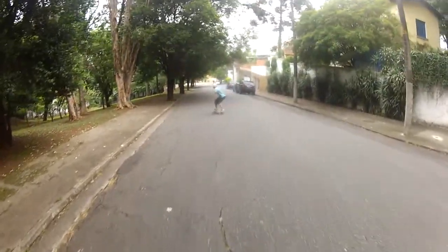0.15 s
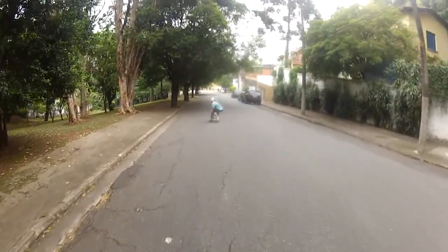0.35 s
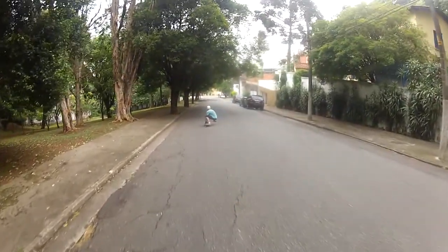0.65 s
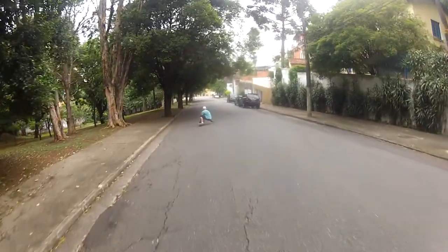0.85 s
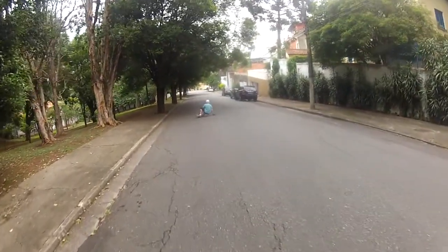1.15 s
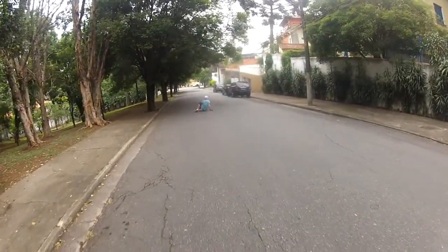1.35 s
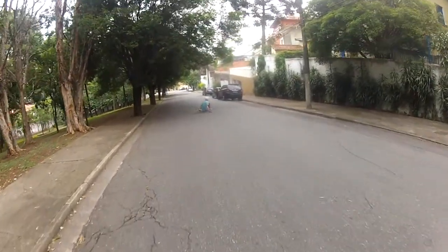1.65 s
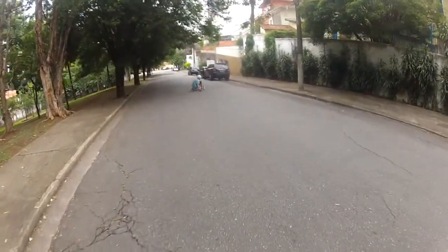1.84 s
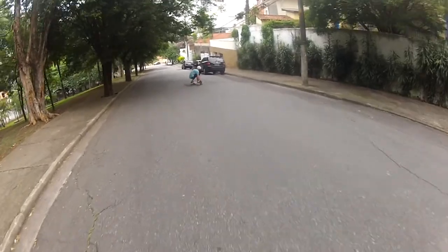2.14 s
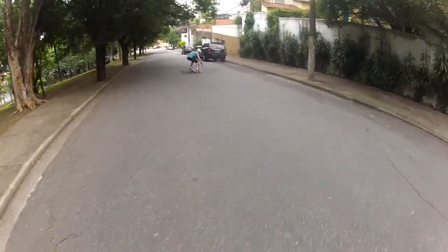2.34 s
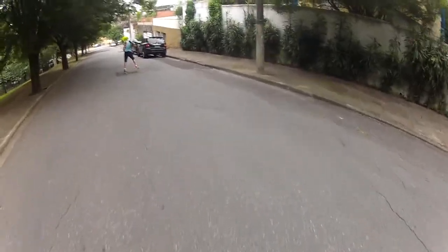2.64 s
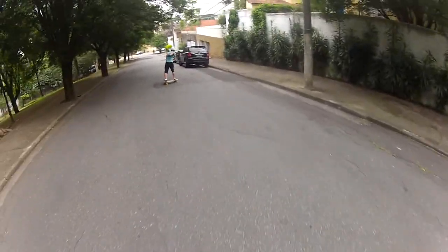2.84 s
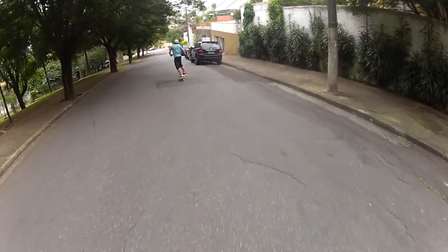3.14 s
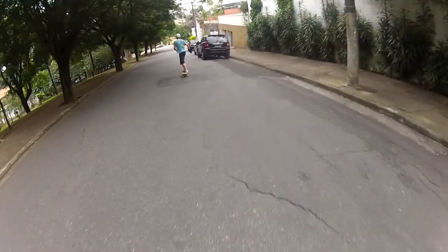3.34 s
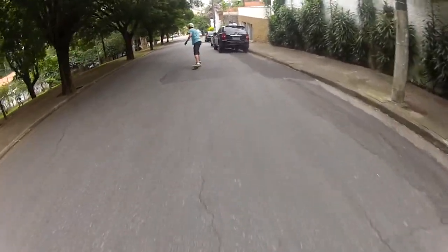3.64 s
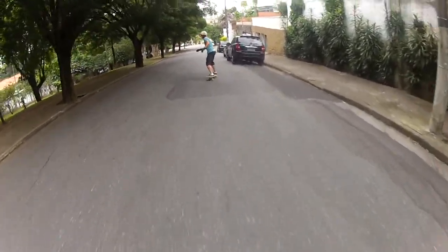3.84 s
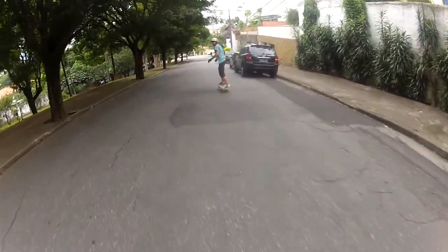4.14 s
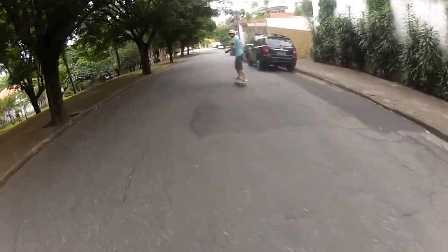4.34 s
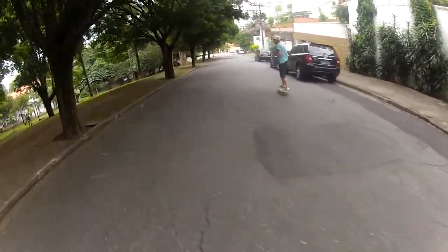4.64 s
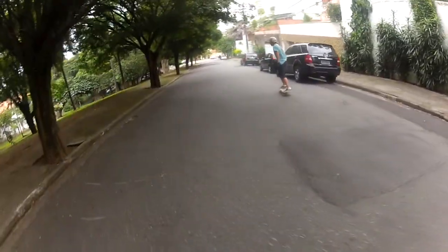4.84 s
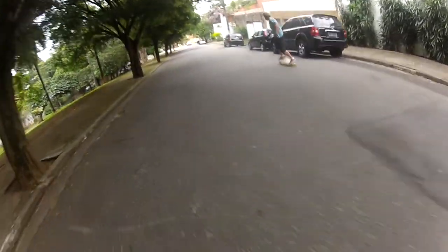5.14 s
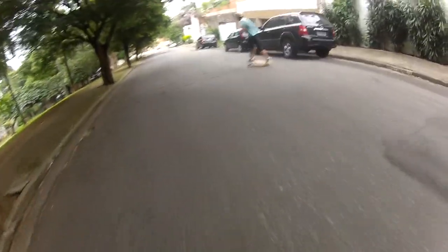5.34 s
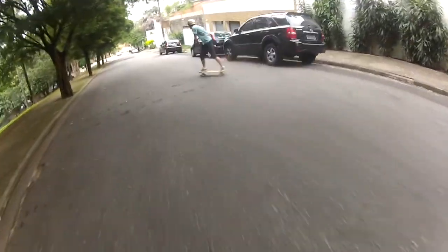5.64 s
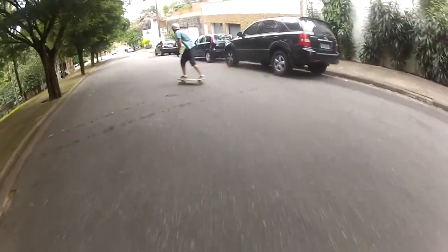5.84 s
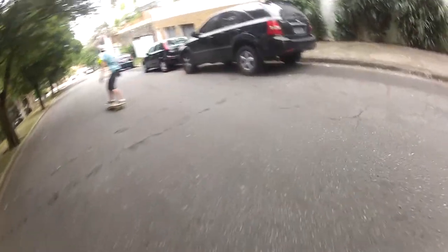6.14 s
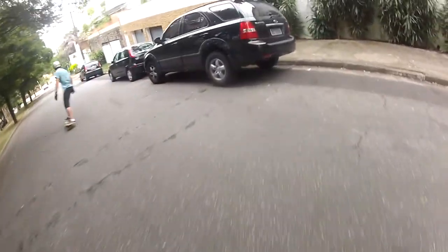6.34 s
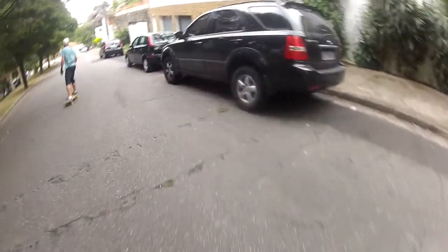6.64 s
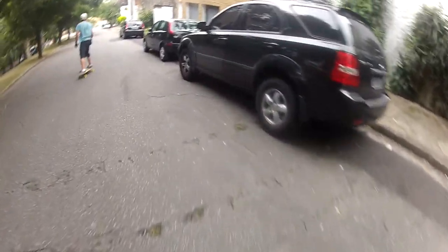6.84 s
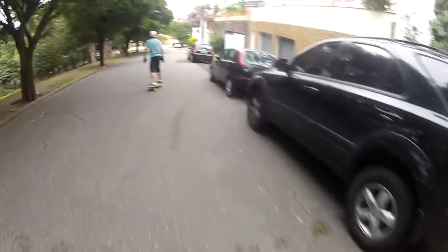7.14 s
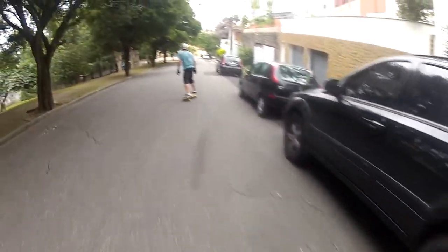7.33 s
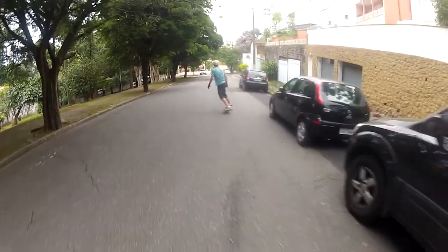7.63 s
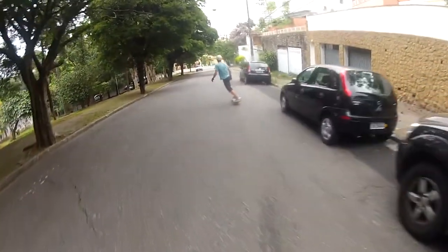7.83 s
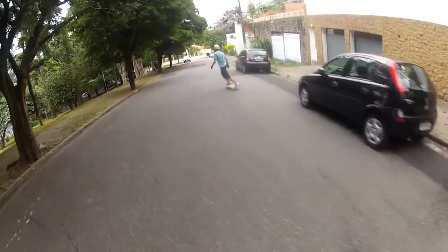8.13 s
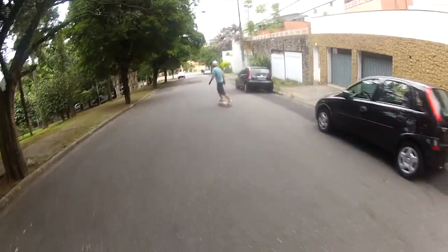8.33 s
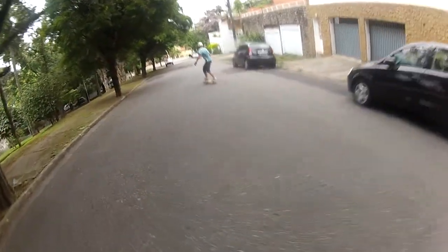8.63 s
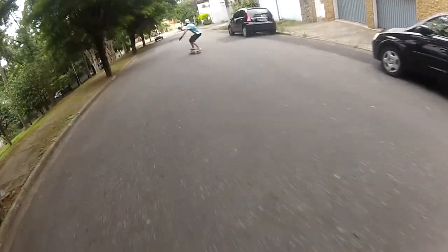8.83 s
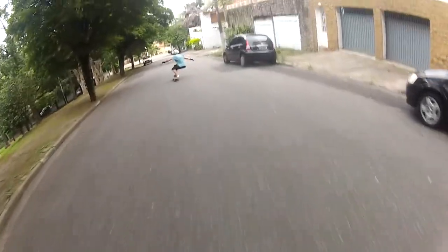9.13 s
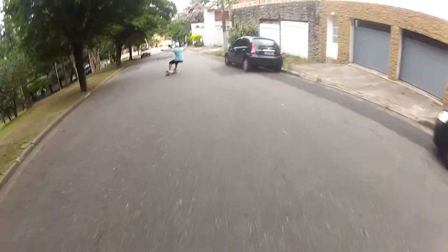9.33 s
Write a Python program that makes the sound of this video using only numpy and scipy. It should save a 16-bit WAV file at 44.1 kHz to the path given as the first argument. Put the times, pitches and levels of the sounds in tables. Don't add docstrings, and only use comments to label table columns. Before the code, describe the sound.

Low muffled rolling of a skateboard on a coarse street, broken by sharp wheel knocks, gritty ticks, wind thumps and faint bird chirps.

```python
import sys
import numpy as np
from scipy import signal
from scipy.fft import rfft, irfft, next_fast_len
from scipy.io import wavfile
from scipy.ndimage import uniform_filter1d, map_coordinates

SR = 44100
rng = np.random.default_rng(int(sys.argv[2]) if len(sys.argv) > 2 else 0)


def voltage_ratio(decibels):
    exponent = np.asarray(decibels, float) / 20
    return 10 ** exponent


def master_out(mix):
    frames = np.transpose(np.atleast_2d(mix))
    ceiling = np.clip(frames, -1, 1)
    pcm = np.round(ceiling * 32767).astype(np.int16)
    wavfile.write(sys.argv[1], SR, pcm)


N = 418068

# t/s, f/Hz, level/dB
WHISTLES = [
    [(0, 3670, -51), (.03, 3650, -60), (.05, 3620, -53), (.075, 3650, -61), (.205, 3680, -64)],
    [(.12, 3550, -58), (.2, 3250, -62)],
    [(7.87, 3700, -64), (7.9, 4060, -54), (7.95, 4270, -63), (8.005, 4200, -50), (8.035, 3800, -61)],
]
# t/s at the top, top f/Hz, fall/ms, level/dB
CHIRPS = [(6.975, 5050, 8, -60), (7.035, 5800, 11, -56), (7.118, 5400, 8, -57), (7.158, 5600, 8, -64),
          (7.208, 5700, 8, -66), (7.255, 5500, 44, -52.5), (7.355, 5600, 16, -53), (7.478, 5400, 16, -62),
          (7.575, 5930, 8, -55), (7.707, 5200, 32, -53), (7.825, 5500, 8, -63)]
BIRD_DB, FAINT_DB = 5.5, -5
RISE_MS, RISE_HZ, FALL_HZ, FALL_HZ_PER_MS = 10.3, 710, 500, 12

# t/s, level/dB
AIR_SPEED = [(0, -32.5), (1.25, -35), (1.65, -28.5), (2.3, -31.5), (2.85, -27.5), (3.2, -29), (4.3, -26.5),
             (4.5, -28.5), (4.68, -22.5), (5.1, -25.5), (5.35, -27.5), (5.7, -28.5), (5.9, -32.5),
             (6.5, -28.5), (7.2, -30.5), (8, -27), (8.5, -25.5), (9.48, -29.5)]
# f/Hz, level/dB
BUFFET = [(18, -28), (30, -11), (55, -4.5), (100, -2.5), (150, -5), (250, -42)]

# level/dB, attack/ms, hold/ms, t60/ms
SCRAPE = (-47.5, 5, 30, 450)
SCRAPE_S = 2.792
# f/Hz, width/Hz, level/dB
SCRAPED = [(2900, 800, 1), (4070, 500, -0.5), (5000, 1200, -13)]
# t/s, peak level/dB, start f/Hz, end f/Hz, length/ms
PEBBLE = (2.3798, -4, 760, 2900, 5.5)
# t/s, peak level/dB, f/Hz
TICKS = [(0.506, -36, 2780), (2.0178, -29, 2500), (2.818, -29.5, 2700), (4.3258, -34, 2600),
         (4.3412, -22.5, 2660), (4.439, -27, 2570), (5.3476, -28, 2320), (5.646, -25, 2620),
         (5.7456, -26.5, 2320), (6.3335, -35, 2760), (6.347, -36, 3160), (6.7127, -37, 2900),
         (6.783, -33.5, 2870), (7.47, -32, 2700), (7.635, -32, 1810), (7.646, -30, 1550),
         (7.871, -32, 2760), (9.2848, -25.5, 2280)]
TICK_T60_MS, TICK_CRACK_DB = 19, -2.5
# t/s, peak level/dB, f/Hz
CHIPS = [(0.4978, -34, 4510), (2.3734, -42, 4100), (2.379, -21.5, 4220), (2.7965, -25.5, 3200),
         (4.3425, -23.5, 4200), (4.4384, -43, 3800), (5.641, -25, 4330), (6.1115, -34, 4270),
         (8.1509, -46, 4800), (8.3814, -43, 4440), (8.662, -34, 4200), (9.2843, -26, 4300)]
CHIP_T60_MS, CHIP_CRACK_DB = 13, -8

# t/s, peak level/dB, f/Hz
CRACKS = [(0.548, -17, 435), (0.946, -10, 525), (1.21, -11.5, 430), (2.002, -9, 557), (3.353, -8, 520),
          (3.647, -8.5, 530), (3.773, -10, 530), (3.881, -4, 420), (4.359, -1.5, 355), (4.441, -5.5, 578),
          (4.531, -3, 338), (4.611, -18, 438), (4.978, -5, 430), (5.102, 0, 424), (5.327, -3, 562),
          (5.61, -9, 458), (5.747, 3, 523), (5.831, -8, 635), (5.897, -2, 530), (5.962, -8, 643),
          (6.016, -5.5, 693), (6.164, -4, 547), (7.122, -13, 467), (7.202, -20, 534), (7.409, -13, 509),
          (7.497, -35, 517), (7.646, -1, 392), (7.771, -8, 573), (7.874, 5.5, 384), (9.293, -5, 500)]
KNOCK_T60_MS, DAMPS_MS_PER_DB = 27.4, 1.4
# t/s, peak level/dB, f/Hz, t60/ms
SLAM = [
    (5.7465, 3, 523, 16),
]

# t/s, load level/dB, side load level/dB when carving
RIDE = [(0, -26.5, -5.5), (.6, -27, -3.5), (.97, -21, -5.5), (1.5, -18.5, -11), (1.9, -21.5, -6),
        (2.3, -15, -6.5), (2.56, -24, -5), (3.45, -18, -5.5), (4.3, -15, -4.5), (4.67, -18, -1),
        (5.4, -17.5, -1.5), (6.17, -17, -1), (6.23, -22.5, -1.5), (6.48, -27.5, -1.5), (6.95, -19, -4),
        (7.85, -16.5, -5), (8.2, -25, -2.5), (9.48, -15.5, -2)]
# t/s, shake level/dB from coarse asphalt, level/dB of fine sand in the bearings
RATTLE = [(0, -55, -12), (.98, -48.5, -13), (1.22, -42, -9.5), (1.7, -44, -9.5), (2.3, -43.5, -18),
          (2.62, -54, -21), (3.5, -46, -9.5), (4.1, -45.5, -13), (4.55, -40, -15.5), (5.05, -37.5, -13),
          (5.55, -38.5, -13), (6.02, -32.5, -15.5), (6.19, -38, -11), (6.205, -45, -8), (6.5, -50, -11.5),
          (6.95, -40, -14), (8.3, -44.5, -13.5), (9.48, -36.5, -12)]
# t/s, half length/ms, lift of the wheels/dB, jolt of the metal/dB
PATCHES = [(.27, 60, 7.5, 6.5), (.46, 52, -2, -3), (2.03, 35, 4, 0), (2.2, 31, 2, 3.5),
           (2.3825, 2.3, -6, -2), (2.42, 40, -0.5, 2.5), (2.98, 59, -1.5, 2.5), (4.06, 44, -0.5, 4),
           (4.3, 140, 3.5, 7.5), (4.42, 18, -6, -3), (4.52, 7.7, -3, -2), (5.1, 80, 2, 2),
           (5.3, 25, 0, 3.5), (5.45, 54, 1, 3), (5.641, 27, 3.5, 2.5), (5.72, 25, 3, 4.5),
           (5.79, 34, -2.5, -1.5), (5.87, 48, 2.5, 1.5), (6.03, 52, 4, 1.5), (6.16, 34, 0, 2.5),
           (6.97, 44, 2, 0), (7.3, 230, -3, -4), (7.65, 13, 3.5, 7.5), (7.81, 50, 1.5, 2.5),
           (8.53, 35, 2, 2), (8.77, 120, 3, 0), (8.9, 61, -5, 1), (9.0, 12, 3.5, -1), (9.1, 104, -3, -5.5),
           (9.29, 12, 3, 3.5)]
PATCH_BENDS = 0.84
# f/Hz, width/Hz, level/dB
DECK = [(133, 61, -10), (196.3, 54, 0), (251.3, 65, -1), (316.7, 74, -4.5)]
DECK_DB, DECK_PER_LOAD, DECK_PER_WIND = -23.5, 0.45, 0.82
# f/Hz, width/Hz, level/dB
WHEELS = [(445.5, 50, 2), (335, 120, -6.5)]
# f/Hz, width/Hz, level/dB
CARVE = [(509.7, 101, -2), (631.5, 234, -5), (787, 147, -8.5)]
# f/Hz, width/Hz, level/dB
TRUCKS = [(900, 190, 4.5), (1540, 1100, 0), (2104, 950, 0.5), (2900, 570, 0)]
# f/Hz, width/Hz, level/dB
AXLE = [(2320, 450, -1), (2690, 290, -3.5)]
AXLE_DB, AXLE_PER_SHAKE = -14.5, 0.97
# f/Hz, width/Hz, level/dB
BEARINGS = [(3850, 490, -1), (4700, 1200, -6.5), (5500, 930, -9)]


def unit(x):
    return x / np.sqrt(np.mean(x ** 2) + 1e-20)


def curves(rows):
    s, *columns = np.transpose(rows)
    return [np.interp(np.arange(N) / SR, s, column) for column in columns]


def wobble(rate):
    knots = rng.standard_normal(int(N * rate / SR) + 4)
    return map_coordinates(knots, [np.arange(N) * rate / SR])


def filtered(x, response):
    m = next_fast_len(N + SR // 2)
    return irfft(rfft(x, m) * response(np.fft.rfftfreq(m, 1 / SR)), m)[:N]


def modes(table, cut_hz, order):
    wall = signal.butter(order, 2 * np.pi * cut_hz, analog=True)

    def response(f):
        ring = 0
        for k, (centre, width, db) in enumerate(table):
            damping = 1j * f * width
            ring = ring + (-1) ** k * voltage_ratio(db) * damping / (centre * centre - f * f + damping)
        return ring * signal.freqs(*wall, 2 * np.pi * f)[1]
    return response


def grit(rate, spread_db, smooth):
    met = rng.random(N) < rate / SR
    size = np.minimum(rng.exponential(size=N), 3)
    stones = unit(met * voltage_ratio(spread_db * size) * rng.uniform(-1.11, 1, N))
    return stones + smooth * rng.standard_normal(N)


def patchy(x, depth_db):
    z = signal.stft(x, nperseg=512)[2]
    field = uniform_filter1d(rng.standard_normal(z.shape), 7, 0)
    field = uniform_filter1d(field, 12, 1)
    return signal.istft(z * voltage_ratio(depth_db * unit(field)), nperseg=512)[1][:N]


def hiss():
    return voltage_ratio(-56.0) * unit(filtered(rng.standard_normal(N), modes([(2700, 2100, 0)], 3800, order=2)))


def chirps():
    notes = []
    for s, hz, fall_ms, db in CHIRPS:
        fall_s = fall_ms / 1000
        fall_hz = FALL_HZ + FALL_HZ_PER_MS * fall_ms
        notes.append([(s - RISE_MS / 1000, hz - RISE_HZ, db + FAINT_DB),
                      (s, hz, db),
                      (s + 0.7 * fall_s, hz - 0.7 * fall_hz, db + 1.0),
                      (s + fall_s, hz - fall_hz, db + FAINT_DB)])
    return notes


def birds():
    out, t = np.zeros(N), np.arange(N) / SR
    for note in WHISTLES + chirps():
        s, hz, db = np.transpose(note)
        edge = np.clip(np.minimum(t - s[0], s[-1] - t) / 0.0036, 0, 1)
        turns = np.cumsum(np.interp(t, s, hz)) / SR
        out += edge * voltage_ratio(np.interp(t, s, db) + BIRD_DB) * np.sin(2 * np.pi * turns)
    return out * voltage_ratio(2.2 * wobble(60))


def wind():
    hz, db = np.transpose(BUFFET)

    def spectrum(f):
        return voltage_ratio(np.interp(np.log(f + 1), np.log(hz), db, -120, -120))
    air = filtered(rng.standard_normal(N), spectrum)
    return voltage_ratio(curves(AIR_SPEED)[0]) * unit(air * voltage_ratio(1.04 * wobble(7.1)))


def scrape():
    db, attack_ms, hold_ms, t60_ms = SCRAPE
    ms = (np.arange(N) / SR - SCRAPE_S) * 1000
    shape = np.clip(ms / attack_ms, 0, 1) * voltage_ratio(-60 * np.maximum(ms - hold_ms, 0) / t60_ms)
    grains = grit(rate=1500, spread_db=4, smooth=0.8)
    return voltage_ratio(db) * shape * unit(filtered(grains, modes(SCRAPED, 6500, order=2)))


def pebble():
    s, db, start_hz, end_hz, length_ms = PEBBLE
    u = np.clip((np.arange(N) / SR - s) * 1000 / length_ms, 0, 1)
    turns = np.cumsum(start_hz + (end_hz - start_hz) * u ** 1.2) / SR
    turns -= turns[round(s * SR)]
    envelope = voltage_ratio(db - 19 * np.minimum(2.4 * u, 1)) * (u > 0) * (1 - u ** 6)
    return envelope * np.sin(2 * np.pi * turns)


def knocks(events, attack_ms, boost_db):
    out, ms = np.zeros(N + SR), np.arange(SR // 8) / SR * 1000
    for s, db, hz, t60_ms, *crack_db in events:
        phase = 2 * np.pi * hz * ms / 1000
        ring = np.sin(phase) + 0.13 * np.sin(phase * rng.uniform(1.234, 1.5))
        if crack_db:
            bright = signal.butter(2, [0.47 * hz, min(1.12 * hz, 5300)], "bandpass", fs=SR)
            noise = signal.lfilter(*bright, rng.standard_normal(len(ms)))
            ring = ring + voltage_ratio(min(crack_db[0], 1) + 9.5) * noise
        decay = voltage_ratio(db + boost_db - 60 * ms / max(t60_ms, 3))
        out[round(s * SR):][:len(ms)] += decay * (1 - np.exp(-ms / attack_ms)) ** 2 * ring
    return out[:N]


def stones():
    ticks = [(*row, TICK_T60_MS, TICK_CRACK_DB) for row in TICKS]
    chips = [(*row, CHIP_T60_MS, CHIP_CRACK_DB) for row in CHIPS]
    return knocks(ticks, attack_ms=0.47, boost_db=5.0) + knocks(chips, attack_ms=0.71, boost_db=2) + pebble()


def wheel_knocks():
    cracks = [(s, db, hz, KNOCK_T60_MS - DAMPS_MS_PER_DB * db) for s, db, hz in CRACKS]
    return knocks(cracks + SLAM, attack_ms=1.0, boost_db=3.5)


def contact(drop_db, before_ms, after_ms):
    ms = np.arange(N // 20 + 1) * 20 / SR * 1000 - 1000 * np.array(CRACKS)[:, :1]
    near = np.exp(-(ms / np.where(ms < 0, before_ms, after_ms)) ** 2).max(axis=0)
    return voltage_ratio(-drop_db * np.interp(np.arange(N) / 20, np.arange(len(near)), near))


def patches():
    t = np.arange(N) / SR
    return sum(np.outer(db, np.exp(-((t - s) * 1000 / half_ms) ** 2)) for s, half_ms, *db in PATCHES)


def trucks(rough, jolt_db):
    shake_db, fizz_db = curves(RATTLE)
    truck_db = shake_db + jolt_db
    axle_db = AXLE_DB + AXLE_PER_SHAKE * (truck_db - truck_db.mean())
    shake = voltage_ratio(2.0 * rough + 0.95 * wobble(110))
    loose = patchy(grit(rate=3000, spread_db=5.5, smooth=1.4) * shake, depth_db=1.5)
    body = unit(filtered(loose, modes(TRUCKS, 2980, order=4)))
    chatter = grit(rate=1500, spread_db=-8.5, smooth=0.48) * shake
    axle = unit(filtered(chatter * voltage_ratio(3.0 * wobble(60)), modes(AXLE, 2100, order=2)))
    balls = patchy(grit(rate=2800, spread_db=8.5, smooth=1.5) * shake, depth_db=-0.1)
    fizz = unit(filtered(balls, modes(BEARINGS, 7100, order=2)))
    return voltage_ratio(truck_db + 0.5) * (body + voltage_ratio(axle_db + 4.0) * axle + voltage_ratio(fizz_db) * fizz)


def deck(rough, lift_db):
    load_db, air_db = curves(RIDE)[0], curves(AIR_SPEED)[0]
    deck_db = DECK_DB + DECK_PER_LOAD * (load_db - load_db.mean())
    deck_db = deck_db + DECK_PER_WIND * (air_db - air_db.mean()) + PATCH_BENDS * lift_db
    force = grit(rate=900, spread_db=1, smooth=1.18) * voltage_ratio(1.8 * rough + 0.46 * wobble(9.2))
    return voltage_ratio(deck_db) * unit(filtered(force, modes(DECK, 437, order=2)))


def wheels(rough, lift_db):
    load_db, carve_db = curves(RIDE)
    road = grit(rate=900, spread_db=1.5, smooth=0.93) * voltage_ratio(0.47 * rough + 1.46 * wobble(30))
    straight = voltage_ratio(-5.5) * unit(filtered(road, modes(WHEELS, 634, order=4)))
    carving = voltage_ratio(carve_db) * unit(filtered(road, modes(CARVE, 768, order=4)))
    return voltage_ratio(load_db + lift_db) * (straight + carving) * contact(drop_db=3, before_ms=6.2, after_ms=4.1)


def board():
    lift_db, jolt_db = patches()
    rough = 0.56 * wobble(11) + 0.49 * wobble(45)
    return trucks(rough, jolt_db) + deck(rough, lift_db) + wheels(rough, lift_db)


def scene():
    background = hiss() + birds() + wind()
    return (background + scrape() + stones() + wheel_knocks() + board())[None]


def low_pass(x):
    return signal.sosfilt(signal.butter(12, 15400, fs=SR, output="sos"), x)


def record(dry):
    clipped = dry / (1 + np.abs(dry / 1.05) ** 8) ** (1 / 8)
    stored = signal.resample_poly(clipped, 40, 147, axis=1)
    held = signal.resample_poly(np.repeat(stored, 4, axis=1), 147, 160, axis=1)
    held = signal.sosfiltfilt(signal.butter(12, 15700, fs=SR, output="sos"), held)
    return low_pass(held[:, :N])


dry = scene()
out = record(dry)
master_out(out)
```